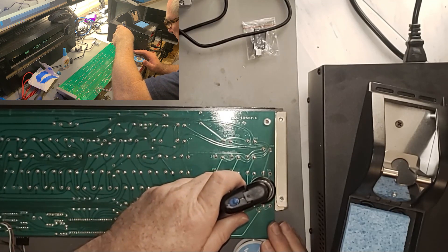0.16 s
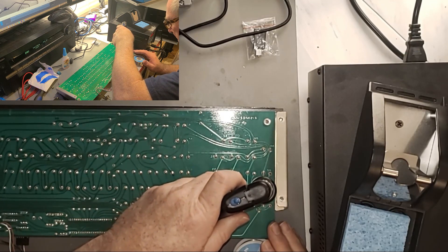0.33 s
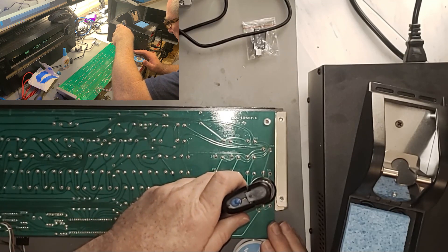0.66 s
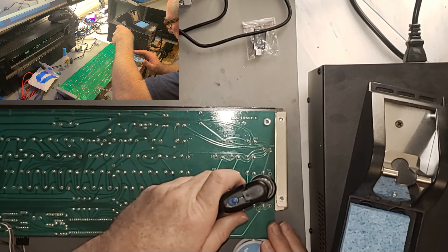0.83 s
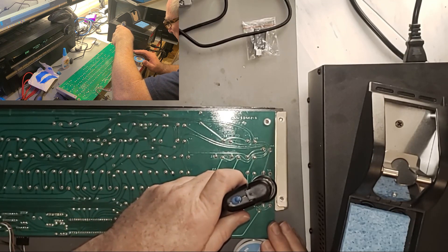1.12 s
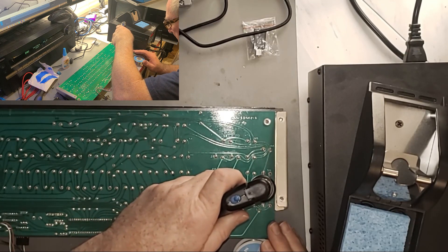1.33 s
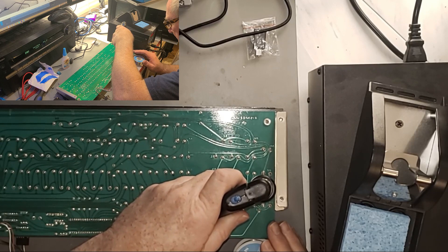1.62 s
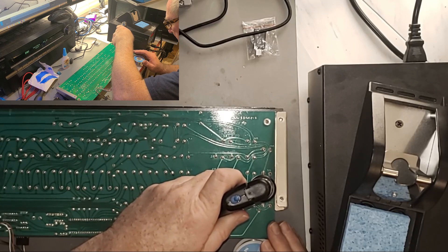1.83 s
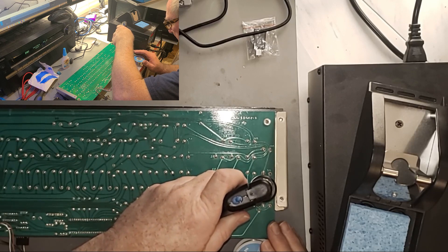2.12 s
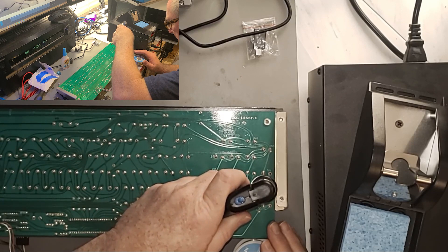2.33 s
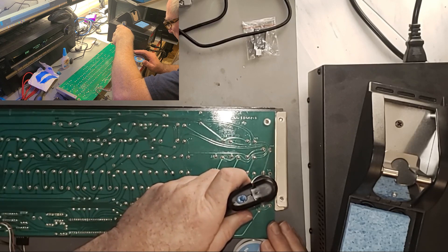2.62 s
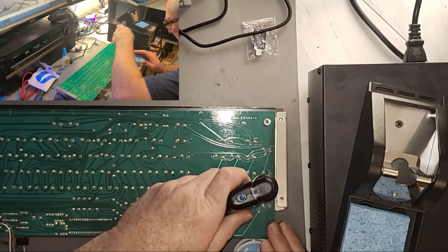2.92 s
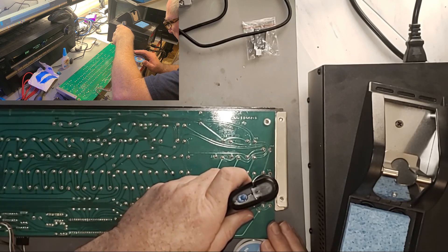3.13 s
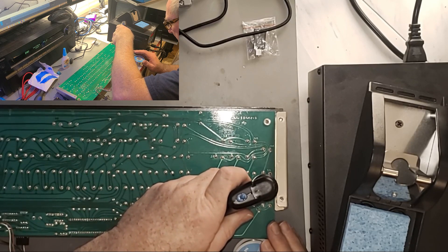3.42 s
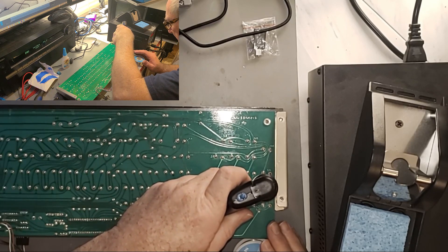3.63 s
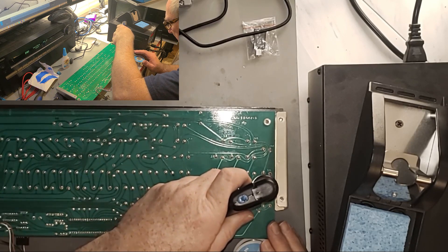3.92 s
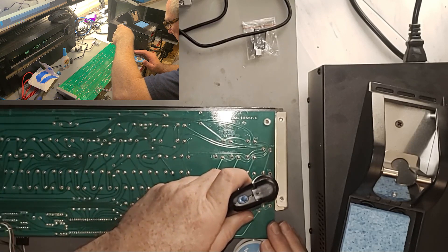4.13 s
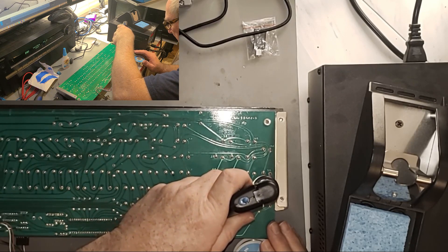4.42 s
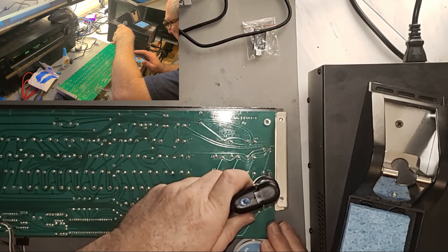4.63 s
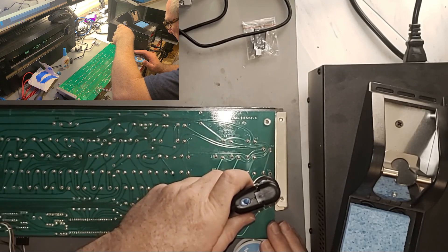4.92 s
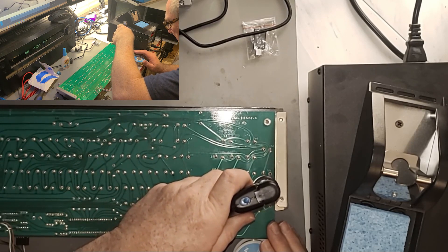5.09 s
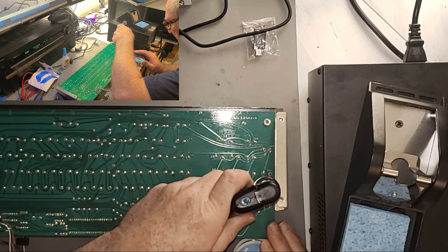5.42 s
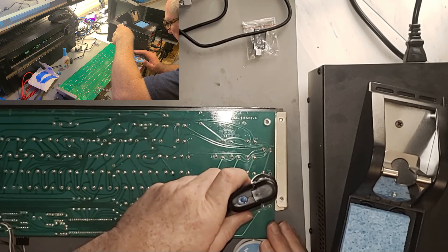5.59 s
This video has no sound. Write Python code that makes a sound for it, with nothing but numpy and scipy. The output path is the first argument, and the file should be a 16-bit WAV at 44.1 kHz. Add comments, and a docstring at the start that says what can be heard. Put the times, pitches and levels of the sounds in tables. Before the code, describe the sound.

A quiet workshop with a low ventilation rumble and a very faint ticking clock. Three light knocks come early, the last the clearest. After a pause, a desoldering gun's trigger clicks close by and its vacuum pump buzzes, dropping in pitch and throbbing as solder slurps and spatters through the hissing nozzle. About a second and a half later, the trigger snaps back and the motor stops with a small knock.

```python
"""A quiet workshop: a desoldering gun works on a circuit board over ventilation rumble and a faint clock.
After a few light knocks the trigger clicks and the vacuum pump spins up. Solder seals the tip;
the motor slows and throbs under load. Slugs of solder ring the nozzle and spatter, air hisses through,
the trigger snaps back and the motor stops with a knock."""
import sys
import numpy as np
from scipy import signal
from scipy.fft import rfft, irfft
from scipy.io import wavfile
from scipy.ndimage import uniform_filter1d

SR = 44100
rng = np.random.default_rng(int(sys.argv[2]) if len(sys.argv) > 2 else 0)


def unload_wav(signal):
    """Save mono or channel-first audio to the path in sys.argv[1] as 16-bit WAV at rate SR, clipped to [-1, 1]."""
    wavfile.write(
        sys.argv[1],
        SR,
        np.round(np.clip(np.atleast_2d(signal).T, -1, 1) * 32767).astype(np.int16),
    )


N = 253575
TIME = np.arange(N) / SR
ON_S, SEAL_S, CLEAR_S, OFF_S, VENT_S = 4.186, 4.325, 5.37, 5.582, 5.602


def motor(free_hz=151.24, loaded_hz=137.26, spin_up_s=0.039, coast_s=0.34, stop_db_per_s=950):
    """Speed, gain and load: the motor starts, labours as the vacuum builds, and coasts to a stop."""
    load = rise(SEAL_S, 0.065)
    hz = (free_hz + (loaded_hz - free_hz) * load) * np.exp(-since(OFF_S) / coast_s)
    db = -11 + 0.5 * load - stop_db_per_s * since(OFF_S)
    return hz, amp(db) * (1 - np.exp(-since(ON_S) / spin_up_s)), load


def pump(stroke_hz=27.36, sway=0.028, drag=0.053):
    """Each stroke drags on the motor's speed; pitch and throb waver about five times a second."""
    hz, gain, load = motor()
    stroke = stroke_hz * (TIME - 4.39)
    waver = cycle(stroke / 5 - .69)
    bite = load * (1 + 0.59 * waver + 0.069 * walk(33))
    speed_hz = hz * (1 + sway * load * waver + drag * bite * cycle(stroke - .25) + 0.005 * walk(80))
    turns = np.cumsum(speed_hz) / SR
    lead_s = np.array([[.0001], [0]])  # hum reaches the left first
    body = housing_hum(turns + hz * lead_s, stroke, load, bite) + side_tones(load, waver)
    valves = pan(1.9) * amp(-16) * valve_chuff(turns, stroke)
    gears = pan(1.7) * amp(13.5) * gear_whine(stroke, waver)
    return gain * (amp(1) * body + valves + gears)


# housing harmonics (order, free level [dB], loaded level [dB], throb depth, lag [strokes], L-R [dB])
HUM_HARMONICS = [(1, -8, -20, 0.73, .45, -4), (2, -2, -5.8, 0.92, 0.48, -2), (3, -6.5, 0, 0.6, 0.94, 2),
                 (4, -27, -14.5, 0.7, 0.76, 7.5)]


def housing_hum(turns, stroke, load, bite):
    """The housing hums at multiples of motor speed and throbs with each stroke."""
    hum = 0
    for order, free_db, loaded_db, depth, lag, pan_db in HUM_HARMONICS:
        db = free_db + load * (loaded_db - free_db) + walk(70)
        throb = 1 + depth * bite * cycle(stroke - lag)
        hum = hum + pan(pan_db) * amp(db) * throb * cycle(order * turns)
    return hum


# tones around the hum's harmonics (frequency [Hz], level [dB])
SIDE_TONES = [(140, -23), (164, -20), (241, -12.3), (296, -12), (404, -22), (450, -15.5), (506, -16.5),
              (538, -23)]


def side_tones(load, waver, bend=.016, free_db=-0.5):
    """Side tones around the motor's hum make it beat and waver."""
    bent_s = TIME + bend * np.cumsum(load * waver) / SR
    tones = sum(amp(db) * cycle(hz * bent_s + 0.16 * walk(14)) for hz, db in SIDE_TONES)
    return amp(free_db * (1 - load)) * tones


# valve air spectrum (frequency [Hz], density [dB])
VALVE_SPECTRUM = [(200, -33), (450, -10), (600, -10), (720, 5.5), (860, 0), (1050, 2.5), (1220, 8.5),
                  (1350, -24), (1600, -15), (2000, -17), (3000, -49)]


def valve_chuff(turns, stroke):
    """Air chuffs through the valves once a turn."""
    pulses = np.exp(0.48 * cycle(turns)) * (1 + 0.28 * cycle(stroke - .1))
    return unit(pulses) * noise(VALVE_SPECTRUM)


# gear tones (frequency [Hz], level [dB])
GEAR_TONES = [(672.9, -39.5), (737.5, -41.5), (802.1, -38.5), (936.7, -39), (995.9, -40.5), (1206, -35.5),
              (1373, -45.5)]


def gear_whine(stroke, waver):
    """The gears whine, wavering in pitch and pulsing with each stroke."""
    whine = 0
    for hz, db in GEAR_TONES:
        gain = amp(db + 2.3 * walk(25))
        pitch_hz = hz * (1 + 0.0041 * waver + 0.00396 * walk(30))
        whine = whine + gain * cycle(np.cumsum(pitch_hz) / SR)
    return whine * (1 + 0.6 * cycle(stroke - .1))


def airflow(steady_db, rush_db, clear_db, fade_db_per_s):
    """Air gain: a first rush, a steady draw, more as the hole clears, a fade as the vacuum leaks."""
    db = steady_db + rush_db * np.exp(-since(ON_S) / 0.044) + clear_db * rise(CLEAR_S, 0.012)
    return (TIME >= ON_S) * amp(db - fade_db_per_s * since(OFF_S))


# nozzle air spectra, broad and high (frequency [Hz], density [dB])
HISS_SPECTRUM = [(880, -19), (1500, 3), (1640, -11), (1960, 2), (2140, -5.5), (3840, -2.5), (4370, -4),
                 (5020, -2), (6430, -6.5), (7840, 5.5), (8920, -18), (10900, -9.5), (11800, -20),
                 (13400, -15), (16000, -6.5)]
SIZZLE_SPECTRUM = [(6500, -40), (7800, -11), (9000, -5.5), (10800, 8), (12000, -3), (13500, 4.5),
                   (15800, -12)]


def nozzle_air():
    """Air hisses through the nozzle and puffs out as the pump stops."""
    draw = airflow(steady_db=-32.6, rush_db=3, clear_db=2, fade_db_per_s=55)
    jet = airflow(steady_db=-39.5, rush_db=16, clear_db=3, fade_db_per_s=112)
    puff = amp(-29) * burst(VENT_S, hold_s=0.0089, t60_s=0.078)
    hiss = draw * amp(1.75 * walk(60)) * noise(HISS_SPECTRUM, split_hz=800, corr=0.35)
    sizzle = (jet + puff) * amp(1.6 * walk(60)) * noise(SIZZLE_SPECTRUM, corr=1)
    return hiss + pan(-1.7) * sizzle


# solder gulps (time [s], level [dB], slug length [s], relative spatter [dB], fall per slug [dB])
SOLDER_GULPS = [(4.227, -21, .0044, -8, 20), (4.242, -11.5, 0.0039, -10, 2), (4.29, -10.5, 0.01, -15.5, 16),
                (4.336, -6.5, 0.0086, -18, 16), (4.373, -4, 0.0074, -7.5, 17),
                (4.575, -13, 0.0055, -9.5, 23), (4.583, -7, 0.0057, -9, 8), (5.52, -19, .009, -3, 16)]
# nozzle resonances (frequency [Hz], level [dB])
NOZZLE_MODES = [(640, -11.5), (829, -1.5), (1030, 2), (1260, -9), (1980, -7), (2900, -12)]
# spatter spectrum (frequency [Hz], density [dB])
SPATTER_SPECTRUM = [(900, -29), (2000, 9.5), (3100, 4), (4000, 1.5), (5000, -2.5), (7500, 0.5), (9000, -19),
                    (11000, -15), (15500, -25)]


def solder_slurp(slugs=4, gap_s=.0138):
    """Each gulp breaks into ever weaker slugs that ring the nozzle and spatter."""
    lead_turns = np.array([[.16], [0]])
    tube = unit(sum(amp(db) * cycle(hz * TIME + 0.29 * walk(170) + lead_turns)
                    for hz, db in NOZZLE_MODES))
    ring_gain = spatter_gain = 0
    for start_s, db, length_s, spatter_db, fall_db in SOLDER_GULPS:
        for k in range(slugs):
            slug_s, slug_db = start_s + k * gap_s, db - k * fall_db
            ring_gain += amp(slug_db) * burst(slug_s, length_s, t60_s=0.018)
            spatter_gain += amp(slug_db + spatter_db) * burst(slug_s, length_s, t60_s=0.034)
    ring = pan(2.3) * uniform_filter1d(ring_gain, size=30) * tube
    return ring + spatter_gain * noise(SPATTER_SPECTRUM, corr=.15) * amp(3.3 * walk(900))


# trigger press and release (time [s], level [dB], t60 factor)
TRIGGER_BLOWS = [(4.1837, -5, 0.97), (5.5728, -5, 0.41)]
# switch modes (frequency [Hz], level [dB], t60 [s])
SWITCH_MODES = [(1860, -5, 0.03), (2040, 8.5, 0.02), (2670, 2, 0.025), (3530, -5.5, 0.034),
                (4145, 6, 0.025), (5990, -9, 0.048), (7300, -8, 0.036), (9100, -19, 0.027),
                (12800, -21, 0.027)]


def trigger_clicks():
    """The switch snaps in and out, bouncing once each time."""
    blows = bounced(TRIGGER_BLOWS, gap_s=0.004, bounce_db=-10.5)
    crack = [(800, -12), (2000, -1.5), (7000, 3), (9000, -0.5), (15500, -7.5)]
    return pan(-1.1) * strike(blows, SWITCH_MODES, crack, crack_db=-1.5, crack_t60_s=.043, skew_s=.00031)


# knocks (time [s], level [dB], t60 factor)
KNOCK_BLOWS = [(.273, -20.5, 0.62), (.957, -16.5, 1.26), (1.4045, -4, 0.68), (1.4082, -5.5, 0.4),
               (5.589, -18.5, 1.5)]
# knock modes (frequency [Hz], level [dB], t60 [s])
KNOCK_MODES = [(826, -16.5, .04), (1097, 5, 0.025), (1290, -10.5, 0.049), (2560, -20.5, 0.056),
               (2880, -28, .04), (3270, -26, .03)]


def light_knocks():
    """Light knocks ring briefly; the last is the pump motor stopping."""
    crack = [(400, -30), (850, -2), (1300, 7), (1700, -15), (3200, -18), (6000, -42), (12000, -70)]
    knocks = strike(KNOCK_BLOWS, KNOCK_MODES, crack, crack_db=-16, crack_t60_s=.071, skew_s=.00008)
    return pan(4.3) * knocks


# room spectra, rumble and thin hiss (frequency [Hz], density [dB])
RUMBLE_SPECTRUM = [(20, -12.5), (30, -5), (40, -6.5), (52, -2), (70, -2.5), (100, -10.5), (140, -12.5),
                   (210, -9), (280, -14), (360, -9.5), (460, -12), (520, -15.5), (1000, -20.5), (1700, -30),
                   (3500, -32), (5000, -38), (7000, -35.5), (8300, -57), (10000, -80)]
ROOM_HISS_SPECTRUM = [(7500, 0), (8300, -8.5), (9000, -17), (10000, -9.5), (12500, -7), (15500, -8.5)]
# ventilation and mains tones (frequency [Hz], level [dB])
FAN_TONES = [(39, -33), (41.5, -36.5), (120, -50), (210, -42.5), (360.3, -42.5), (461, -44.5)]


def ventilation():
    """Ventilation rumbles under a thin hiss and wavering fan and mains tones."""
    rumble = amp(-28 + .5 * walk(5.93)) * noise(RUMBLE_SPECTRUM, split_hz=560, corr=-0.11, bass_corr=0.9)
    hiss = amp(-56) * noise([(6000, -64)] + ROOM_HISS_SPECTRUM, corr=0.89)
    tones = sum(amp(db + 2.9 * walk(5.15)) * cycle(hz * TIME + 0.13 * walk(5)) for hz, db in FAN_TONES)
    return rumble + hiss + tones


# clock case modes (frequency [Hz], level [dB], t60 [s])
CLOCK_MODES = [(1110, -2, .06), (1785, 7, 0.16), (2450, -5, 0.091), (2980, -3, 0.15), (3650, -6, 0.12),
               (5060, -8, 0.1), (7100, -18.5, .1)]


def wall_clock(first_tick_s=.1245):
    """The clock steps once a second; its escapement drops back a moment later."""
    ticks = [(first_tick_s + second, -34.7, 1) for second in range(N // SR + 1)]
    blows = bounced(ticks, gap_s=.046, bounce_db=-7)
    crack = [(700, -16), (1100, 8), (3600, -7), (7500, -9), (9000, -35), (12000, -53)]
    return strike(blows, CLOCK_MODES, crack, crack_db=-.5, crack_t60_s=.22, skew_s=.00022)


def reflections(x, wet_db, t60_s):
    """Bench and nearby walls scatter the sound into a short tail."""
    scatter = noise([(100, 4.5), (1000, 0.5), (6000, 1.5), (16000, -8.5)], split_hz=696)
    tail = (scatter * burst(0, 0, t60_s) * (TIME > .004))[:, :SR // 2]
    tail /= np.sqrt(np.sum(tail ** 2, axis=1, keepdims=True))
    return x + amp(wet_db) * signal.fftconvolve(x, tail, axes=1)[:, :N]


def strike(blows, modes, crack_spectrum, crack_db, crack_t60_s, skew_s):
    """Each blow rings the modes, skew_s later on the left, and adds a crack of noise."""
    out, grit, size = np.zeros((2, N)), noise(crack_spectrum, corr=.35), SR // 8
    t = np.arange(size) / SR
    skewed_s = t - np.array([[skew_s], [0]])
    attack = 1 - np.exp(-t / 0.0013)
    for start_s, blow_db, t60_factor in blows:
        ring = sum(amp(db - 60 * t / (t60_s * t60_factor)) * np.sin(2 * np.pi * hz * skewed_s)
                   for hz, db, t60_s in modes)
        i = int(start_s * SR)
        crack = grit[:, i:i + size] * amp(crack_db - 60 * t / crack_t60_s)
        out[:, i:i + size] += amp(blow_db) * attack * (ring + crack)
    return out


def bounced(blows, gap_s, bounce_db):
    """Each blow plus a weaker second contact."""
    return list(blows) + [(s + gap_s, db + bounce_db, t60_factor) for s, db, t60_factor in blows]


def noise(spectrum, split_hz=900, corr=0, bass_corr=0.31):
    """Stereo noise, rms 1, from (frequency [Hz], density [dB]); L/R correlation shifts at split_hz."""
    f = np.fft.rfftfreq(N, 1 / SR) + 1
    hz, db = np.transpose(spectrum)
    shape = amp(np.interp(np.log(f), np.log(hz), db))
    correlation = np.clip(corr + (bass_corr - corr) / (1 + (f / split_hz) ** 3), -1, 1)
    mid, side = rfft(rng.standard_normal((2, N))) * np.sqrt([1 + correlation, 1 - correlation])
    return unit(irfft(np.array([mid + side, mid - side]) * shape, N))


def walk(rate_hz):
    """Smooth random drift, rms 1."""
    hold = int(SR / rate_hz)
    steps = np.repeat(rng.standard_normal(N // hold + 1), hold)
    return unit(uniform_filter1d(uniform_filter1d(steps, hold), hold)[:N])


def burst(start_s, hold_s, t60_s):
    """Envelope: jump, hold, decay."""
    return (TIME >= start_s) * amp(-60 * np.clip((TIME - start_s - hold_s) / t60_s, 0, 3))


def rise(middle_s, width_s):
    """Smooth step from 0 to 1."""
    return (1 + np.tanh((TIME - middle_s) / width_s)) / 2


def since(start_s):
    """Seconds after start_s, zero before."""
    return np.maximum(TIME - start_s, 0)


def cycle(turns):
    """Cosine of a phase in turns."""
    return np.cos(2 * np.pi * turns)


def pan(db):
    """Channel gains for an L-R level."""
    return amp(np.array([[db], [-db]]) / 2)


def amp(db):
    """Decibels to gain."""
    return 10 ** (np.asarray(db) / 20)


def unit(x):
    """Scale to rms 1."""
    return x / np.sqrt(np.mean(x ** 2))


def scene():
    """Gun and knocks with their reflections, over the workshop background."""
    knocks = light_knocks()
    gun = reflections(trigger_clicks() + nozzle_air() + solder_slurp(), wet_db=-9.5, t60_s=0.19)
    gun += reflections(pump(), wet_db=-16, t60_s=0.12)
    return gun + reflections(knocks, wet_db=-18, t60_s=0.12) + ventilation() + wall_clock()


def record(dry, cutoff_hz=15900):
    """The loudest peaks are rounded and the highest treble is cut off."""
    rounded = dry / (1 + dry ** 6) ** (1 / 6)
    return signal.sosfilt(signal.ellip(10, .2, 70, cutoff_hz, fs=SR, output="sos"), rounded)


dry = scene()
out = record(dry)
unload_wav(out)
```